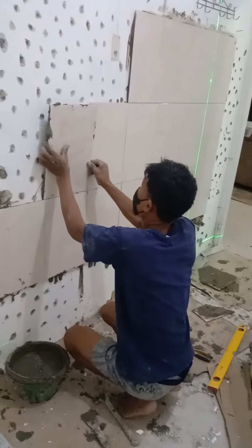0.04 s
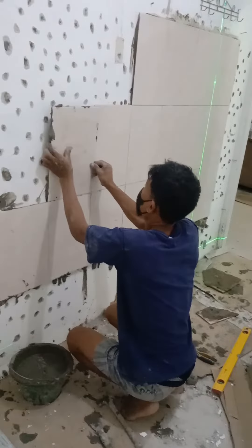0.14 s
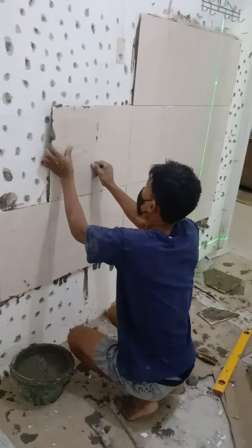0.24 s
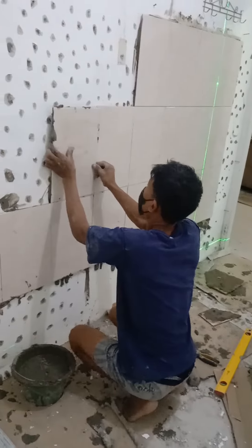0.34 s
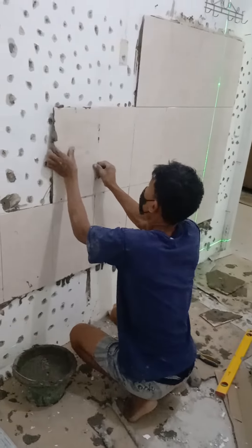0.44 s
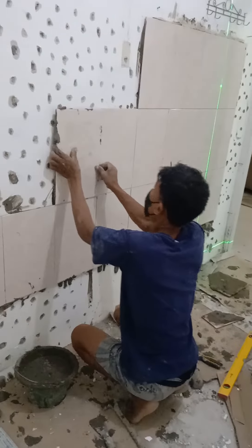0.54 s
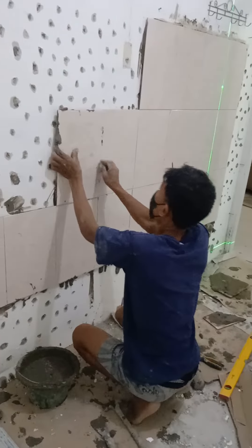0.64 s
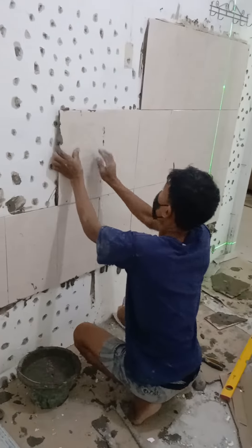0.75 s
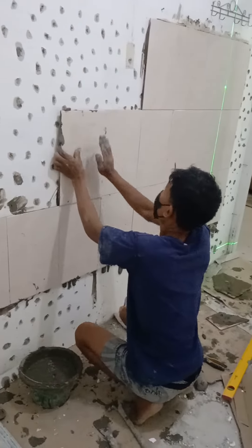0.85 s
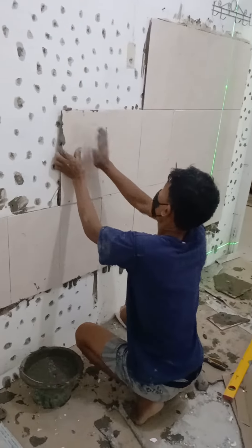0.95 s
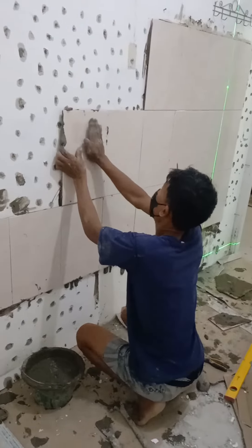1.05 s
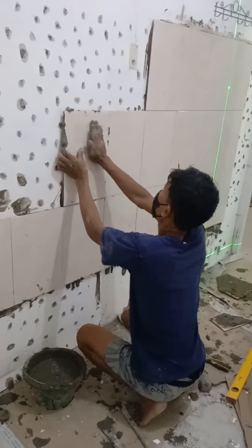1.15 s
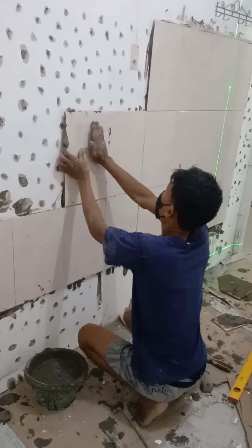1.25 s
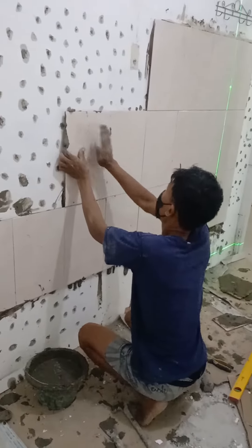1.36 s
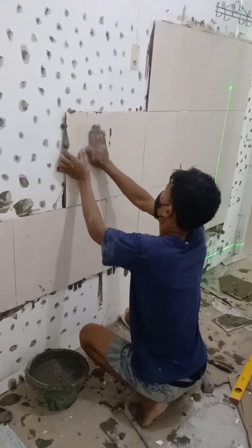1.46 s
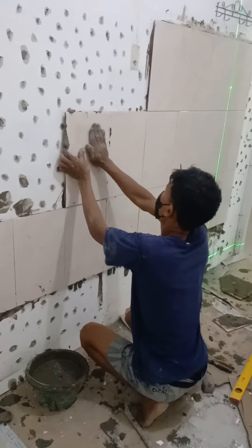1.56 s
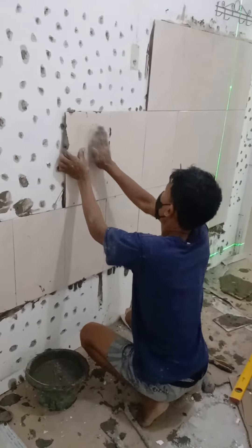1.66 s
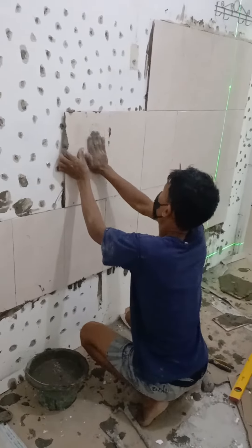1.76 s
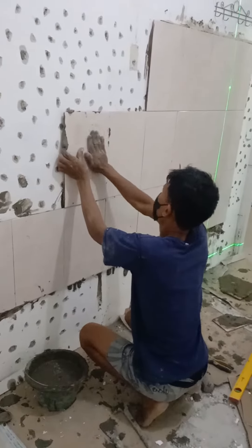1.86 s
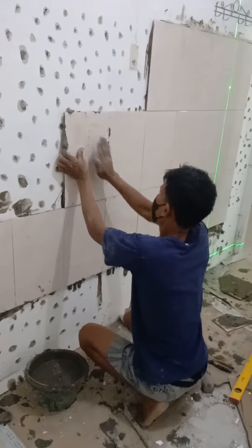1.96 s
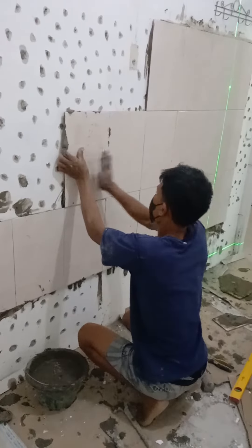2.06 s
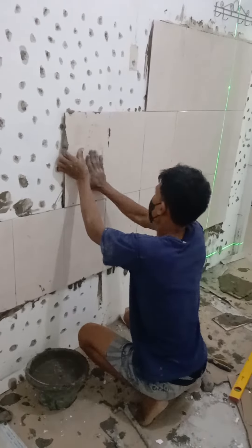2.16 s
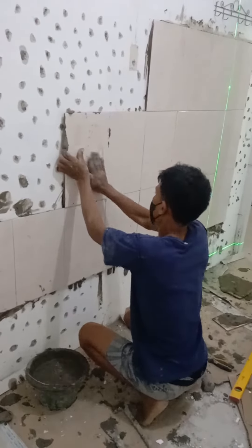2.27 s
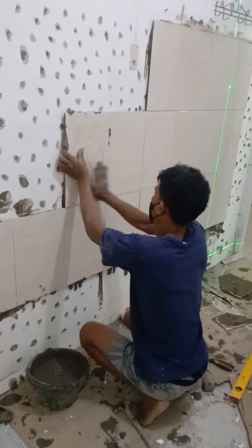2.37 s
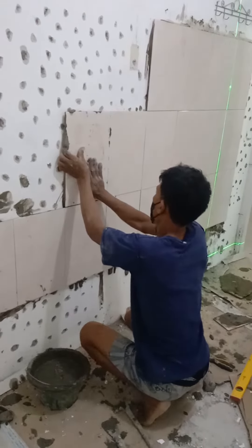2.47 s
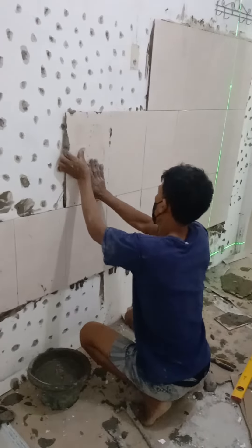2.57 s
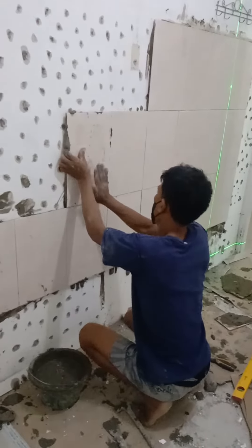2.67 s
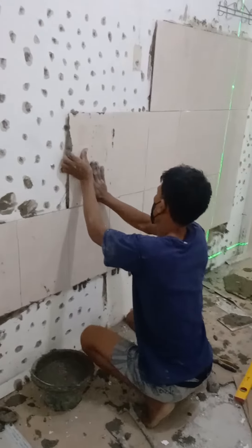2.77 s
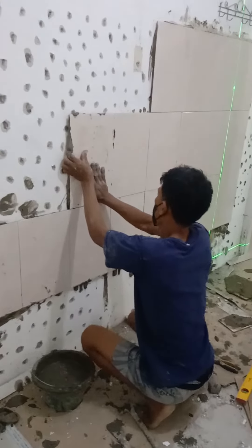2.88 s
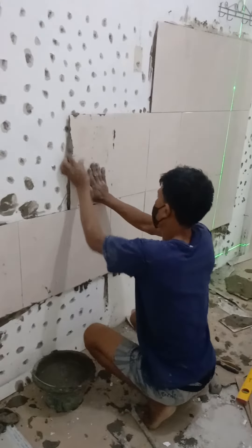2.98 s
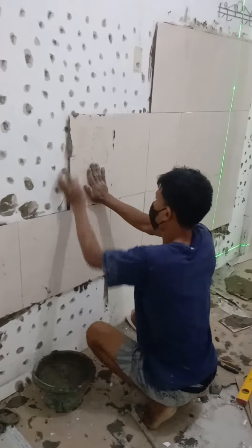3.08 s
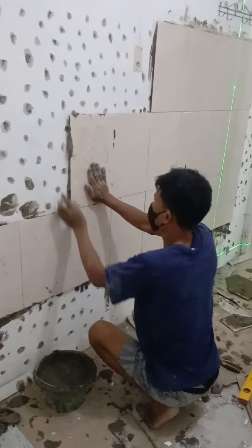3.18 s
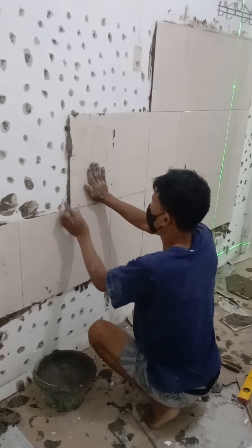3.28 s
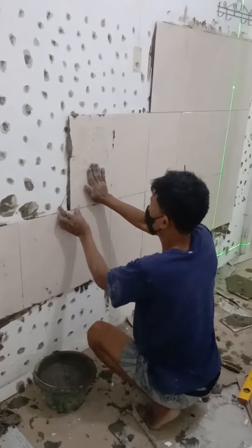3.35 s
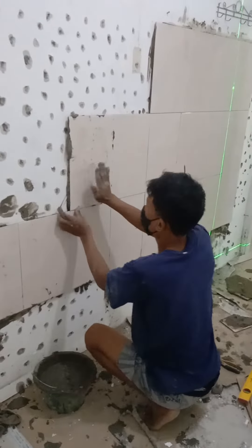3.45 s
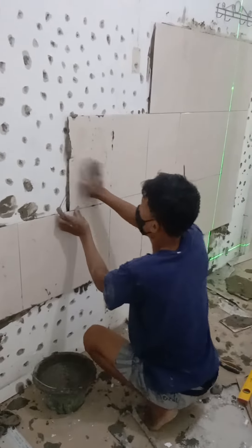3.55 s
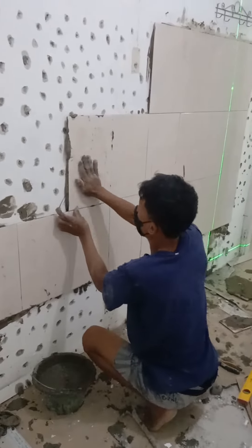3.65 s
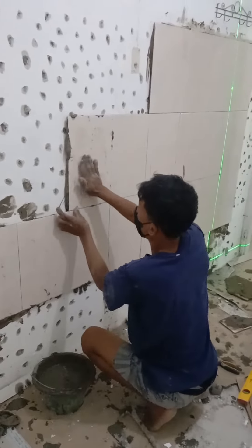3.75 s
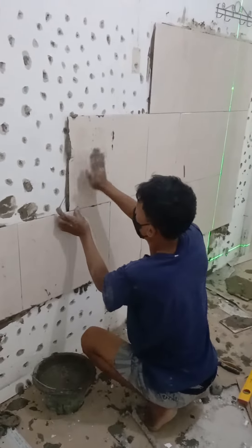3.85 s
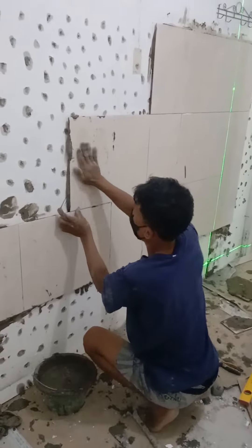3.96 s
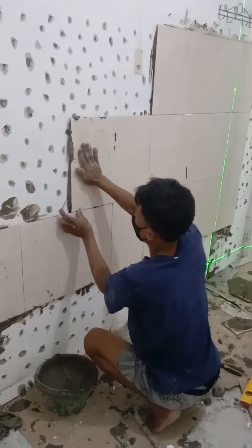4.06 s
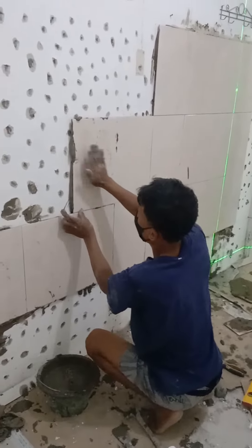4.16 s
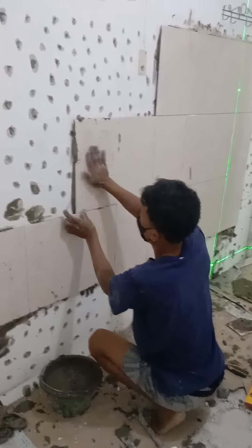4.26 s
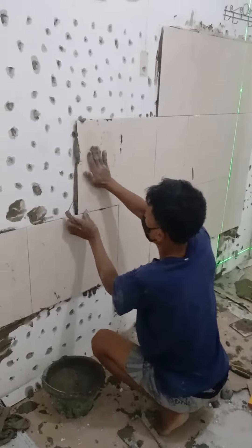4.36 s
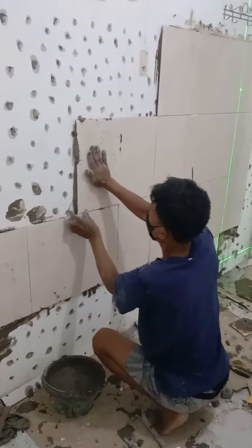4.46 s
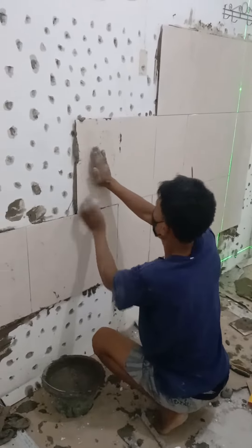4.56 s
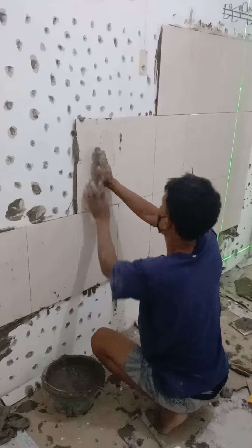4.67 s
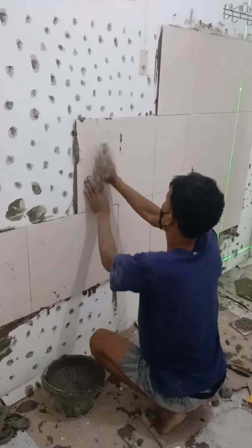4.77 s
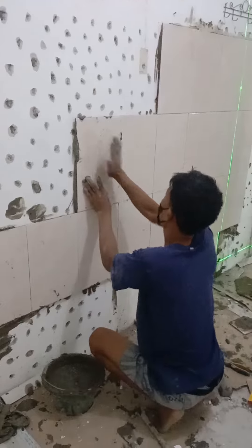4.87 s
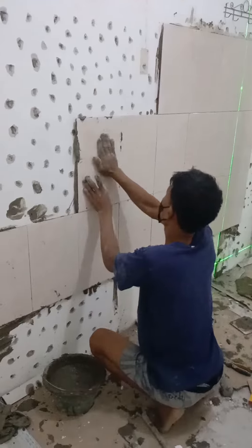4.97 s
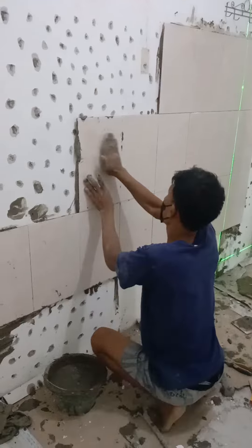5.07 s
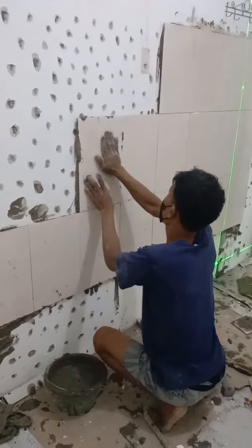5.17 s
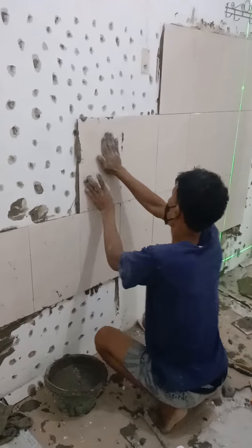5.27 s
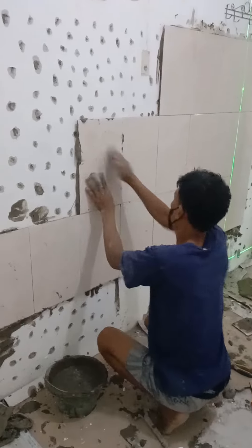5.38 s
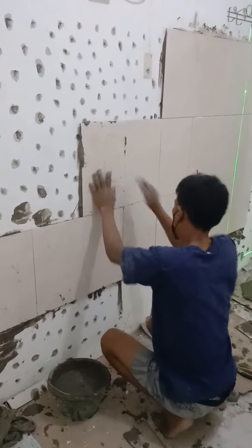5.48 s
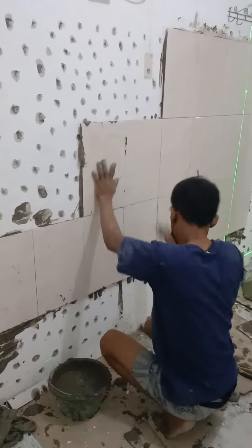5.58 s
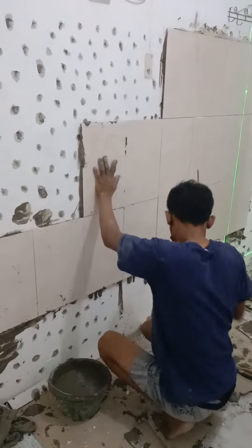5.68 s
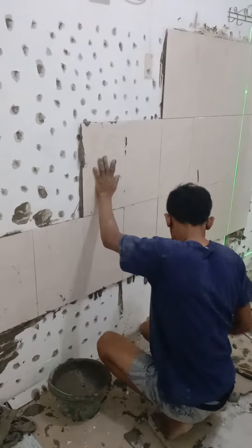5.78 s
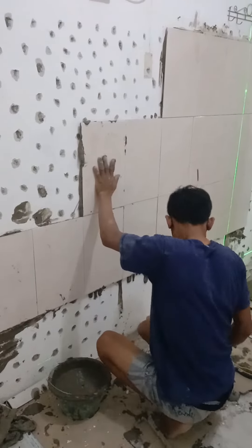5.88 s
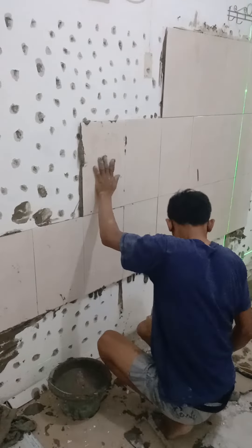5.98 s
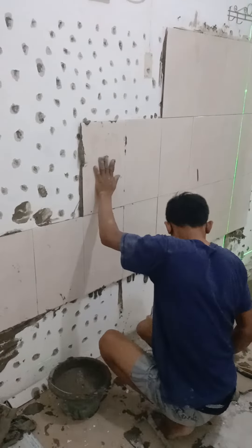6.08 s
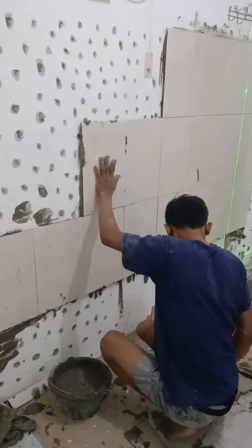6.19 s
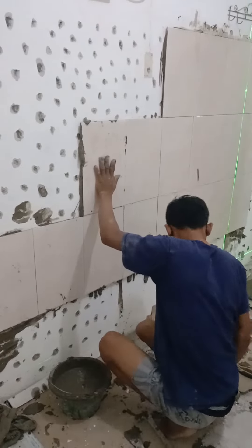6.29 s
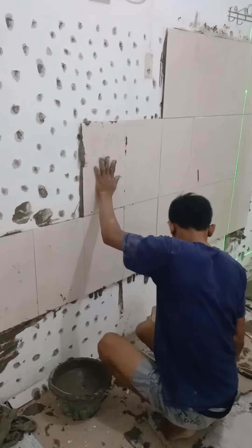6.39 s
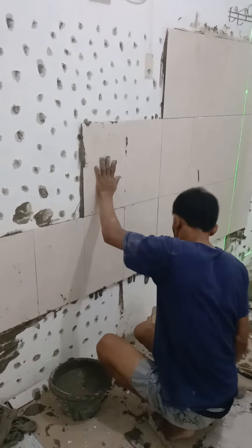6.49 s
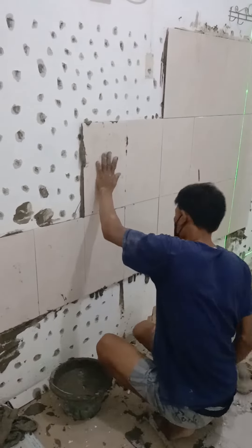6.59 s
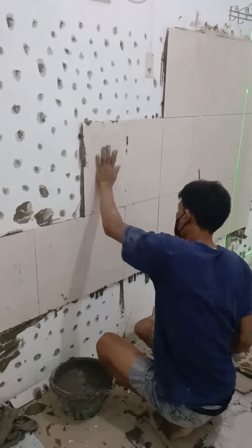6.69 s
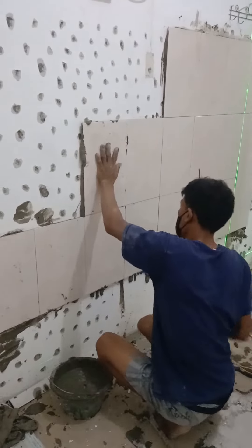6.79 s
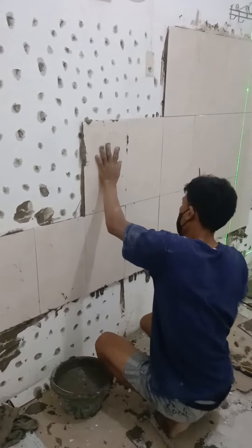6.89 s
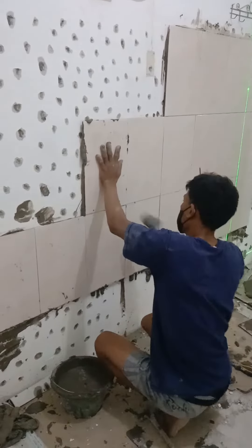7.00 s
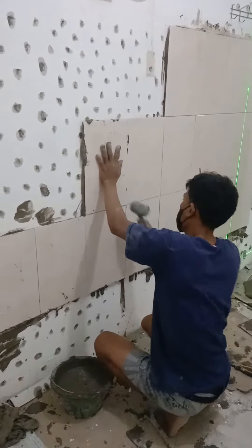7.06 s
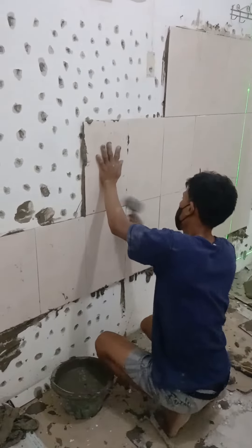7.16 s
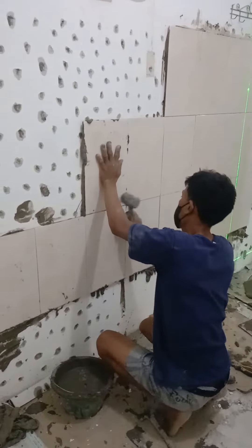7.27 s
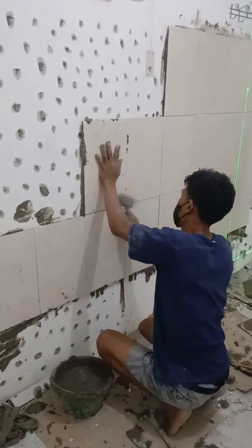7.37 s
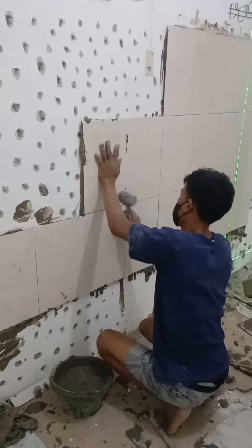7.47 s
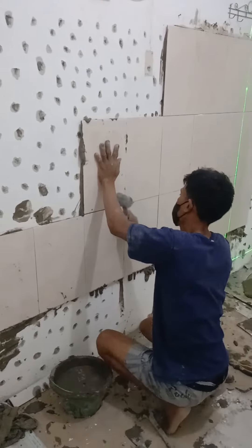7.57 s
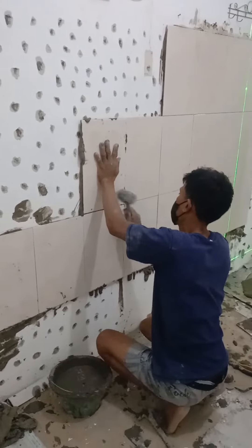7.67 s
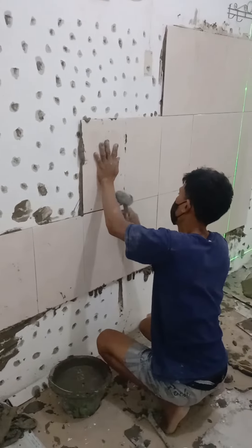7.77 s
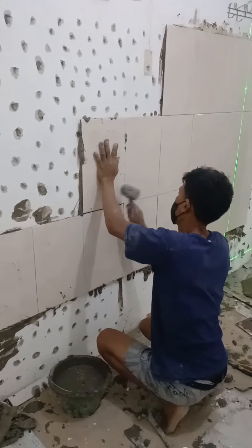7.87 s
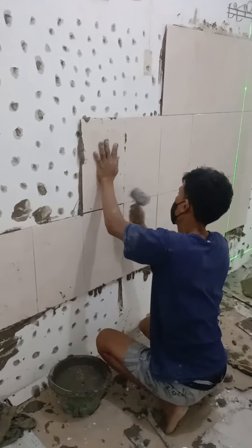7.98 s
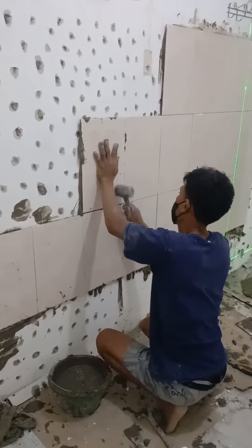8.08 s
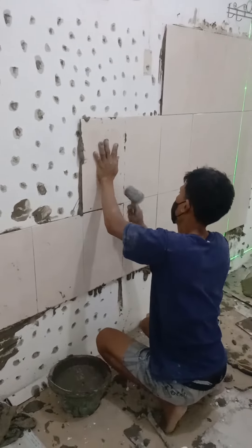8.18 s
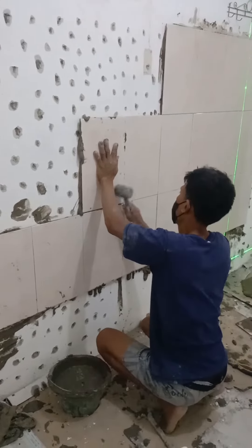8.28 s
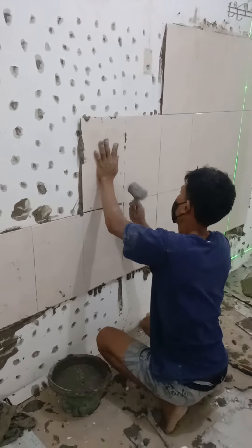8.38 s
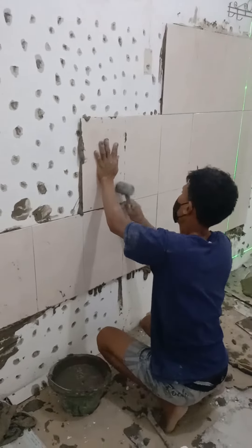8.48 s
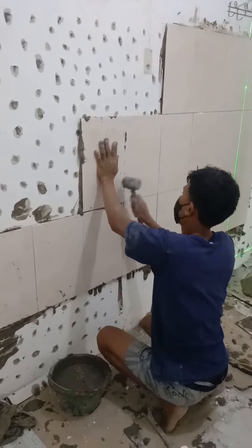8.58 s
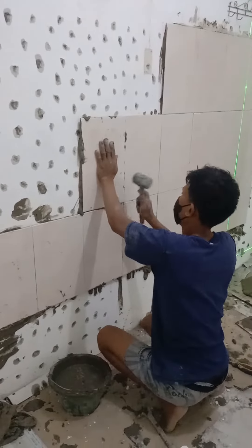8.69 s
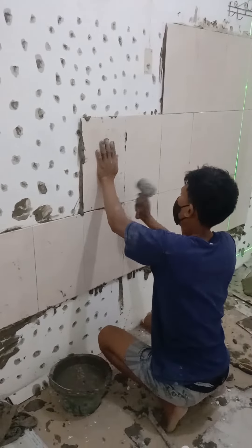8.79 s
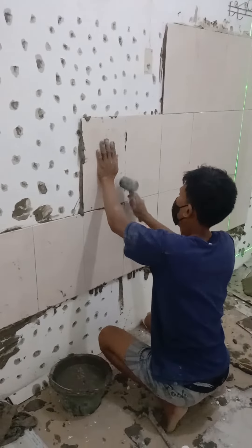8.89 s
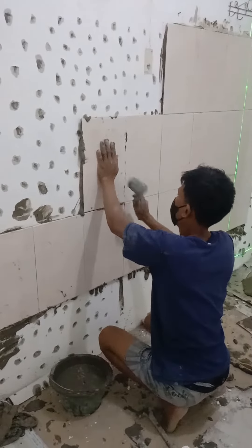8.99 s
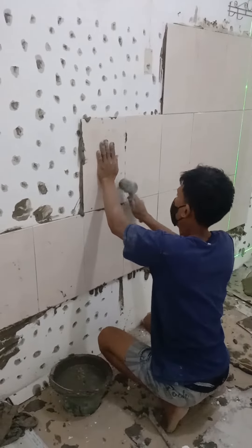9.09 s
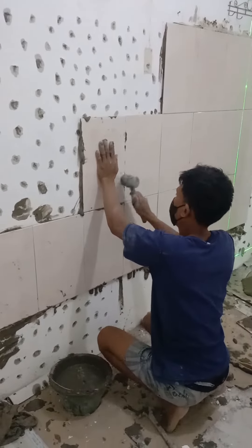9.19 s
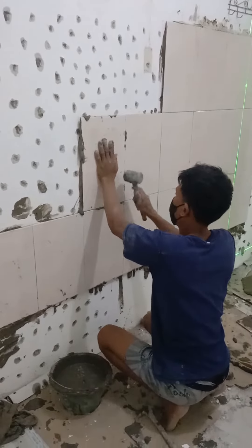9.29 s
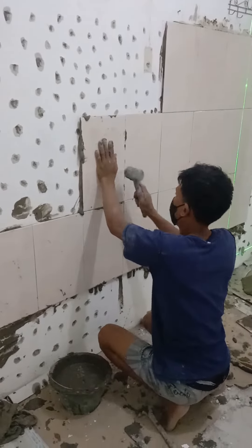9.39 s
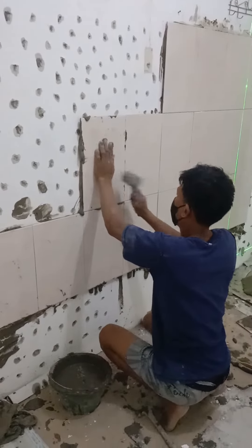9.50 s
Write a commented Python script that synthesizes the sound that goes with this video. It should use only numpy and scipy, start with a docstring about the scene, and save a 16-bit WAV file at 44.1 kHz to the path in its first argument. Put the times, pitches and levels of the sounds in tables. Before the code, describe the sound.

In a small bare bathroom, a hand rubs a sandy wall tile in short gritty strokes, then slaps it eleven times, each smack slightly different, with a damped tile ring. A mallet scrapes off the gritty floor, then knocks nine times in a quick run, growing more hollow. A brief last rub follows. The microphone is in the room; blows boom and ring, loud ones squashed, tails shortened.

```python
"""A tiler beds a ceramic wall tile in wet mortar in a small, bare bathroom.
His hand strokes the sandy joint, then slaps the tile eleven times: noise bursts through resonances of hand and tile.
A mallet is dragged off the gritty floor (a shower of clicks), then taps a quick run of nine filtered pulses.
One last stroke follows. Small ticks and faint noise lie between; the hard room booms and rings after
each blow, a noise suppressor shortens the tails and a limiter ducks the loudest blows."""
import sys
import numpy as np
from scipy import signal
from scipy.fft import rfft, irfft
from scipy.io import wavfile
from scipy.ndimage import uniform_filter1d, minimum_filter1d

SR = 44100
rng = np.random.default_rng(int(sys.argv[2]) if len(sys.argv) > 2 else 0)


def to_wav(sig):
    """Store sig (one row per channel, or 1-D mono) as 16-bit WAV at the path in sys.argv[1].

    Samples outside -1..1 are clipped; the rate is SR.
    """
    pcm = np.clip(np.atleast_2d(sig), -1, 1) * 32767
    pcm = np.round(pcm).astype(np.int16)
    wavfile.write(sys.argv[1], SR, pcm.T)  # frames by channels


N = 420713
HZ = np.fft.rfftfreq(8192, 1 / SR) + 1  # grid of all spectra; +1 keeps the logarithm finite
TILE_HZ, TILE_OCTAVES = 1267.4, 0.056  # the tile's own damped note, half width
LEAD_S = 0.004  # fingertips ahead of the palm
TAIL = SR * 3 // 4  # room response [samples]


def palm(standing):
    """Two resonances of hand and tile ring briefly under each slap; a flatter hand cracks sharper."""
    # palm slaps: (time [s], force [dB], low thud [dB], skin crack [dB], tile ring [dB], main resonance [dB],
    # main resonance of hand and tile [Hz], second resonance [Hz])
    slaps = [(1.0555, 19, 1, -5.5, 10.4, 13.4, 162, 560), (1.5063, 25, 1, -8, 13, 11.5, 1770, 1820),
             (1.813, 25.55, 3, -3, 15.7, 6.5, 2580, 300), (2.161, 26, 7.5, 0.5, 15, 10.2, 2730, 1230),
             (2.4563, 23.76, 5.5, -4.5, 11, 8.1, 1970, 3060), (2.7968, 24.4, 0, -7.5, 9.7, 6.6, 506, 2200),
             (3.6267, 25.5, 3.5, -1, 9.9, 9.6, 3510, 2550), (4.007, 24.4, 2, 4.5, 5, 7, 2400, 2020),
             (4.319, 22.5, 4.5, 5, 1.7, 8, 1950, 2500), (4.961, 23.5, 0, 3, 4, 12, 990, 3470),
             (5.205, 27.14, 4, 1, 8, 9.4, 354, 2950)]
    # palm colour: (frequency [Hz], level [dB])
    palm_colour = [(40, 1.5), (130, -4), (300, -6.5), (560, -2), (780, -7), (1100, -4), (1600, -4.5),
                   (2200, 0.5), (3100, 0.5), (4500, -4), (6500, -3.5), (16000, -15)]
    resonance_octaves, second_db = 0.18, 5  # half width of both; level of the second
    flat_slap_db, flat_direct_db = 31, -1  # force plus crack of a flat slap, its direct sound
    direct_per_db = 0.66  # direct sound per dB of force plus crack

    out = np.zeros(N)
    for s, force_db, thud_db, crack_db, ring_db, main_db, main_hz, second_hz in slaps:
        colour_db = read(palm_colour, HZ) + tile_ring(ring_db)
        colour_db += thud_db * (1 - above(750)) + crack_db * above(2500)
        resonances_db = peak(main_hz, main_db, resonance_octaves)
        resonances_db += peak(second_hz, second_db, resonance_octaves)
        direct_db = flat_direct_db + direct_per_db * (force_db + crack_db - flat_slap_db)
        slap = signal.fftconvolve(landing(), pulse(force_db + colour_db + resonances_db))
        add(out, s - LEAD_S, in_room(slap, echoes() + standing, direct_db))
    return out


def landing(roll_s=0.00064, fingertips_db=-26):
    """Fingertips touch first, then the palm rolls flat: a brief burst with a level spectrum."""
    t = np.arange(SR // 100) / SR - LEAD_S
    burst = np.exp(-0.5 * (t / roll_s) ** 2) * rng.standard_normal(len(t))
    z = rfft(burst)
    flat = irfft(z / abs(z), len(t))
    fingertips = rng.standard_normal(len(t)) * (t < 0)
    return flat + amp(fingertips_db) * fingertips / np.linalg.norm(fingertips)


def mallet(standing, wander_rad=0.78, ring_db=4, clack_hz=1200):
    """Rubber on mortar-damped tile: a thump and a click, from nearly the same spot each time."""
    # mallet blows: (time [s], force [dB], frequency above which the click fades [Hz])
    blows = [(7.2582, 26, 7700), (7.4339, 30, 8200), (7.622, 30.5, 6500), (7.8155, 32, 6560),
             (8.0825, 34, 7400), (8.2910, 32.5, 7300), (8.4988, 32.5, 8640), (8.9056, 32, 9500),
             (9.1256, 32.5, 4200)]
    # mallet colour: (frequency [Hz], level [dB])
    mallet_colour = [(40, -5.5), (120, -1), (300, 1.5), (400, -12), (490, -5.5), (680, -4.5), (830, -11.5),
                     (1100, -13), (1650, -17.5), (2600, -9), (3300, -13), (4300, -15.5), (5600, -12.5),
                     (16000, -4.5)]
    # clack as the mallet works towards a hollower part of the tile: (time [s], level [dB])
    hollow = [(7.3, -2.5), (7.75, -6), (8.1, 2), (8.9, 7)]
    # rubber stiffens under a firmer blow, so the click outgrows the thump
    firm_blow_db, firm_click_db, click_per_db = 32, -3.5, 0.63

    out = np.zeros(N)
    spot = echoes()
    for s, force_db, fade_hz in blows:
        clack_db = np.interp(s, *np.transpose(hollow))
        click_db = firm_click_db + click_per_db * (force_db - firm_blow_db)
        body_db = read(mallet_colour, HZ) + tile_ring(ring_db) + peak(clack_hz, clack_db, octaves=0.3)
        click_colour_db = click_db * above(1140) - 22 * above(fade_hz)
        room = np.cos(wander_rad) * spot + np.sin(wander_rad) * echoes() + standing
        blow = -pulse(force_db + body_db + click_colour_db)  # the tile is pushed away first
        add(out, s, in_room(blow, room, direct_db=-9.0))
    return out


def strokes():
    """The hand rubs the sandy tile: each shower of grains swells, fades and stirs the tile's note."""
    # strokes: (start [s], swell [s], length [s], peak level [dB], brightness [dB per octave])
    hand_strokes = [(.029, .008, 0.088, -38, -1.5), (.104, .02, 0.15, -32, -0.5),
                    (0.191, .055, .21, -40.5, 0), (0.334, 0.094, 0.18, -37.5, -0.5),
                    (0.637, 0.026, 0.091, -41, -0.5), (1.373, .034, .09, -44.5, 2.5),
                    (3.201, .007, .045, -54, 2.5), (3.366, .025, .07, -56, 1.5),
                    (3.513, .01, 0.042, -56.5, 0.5), (5.768, .08, .14, -41.5, 5.5),
                    (9.341, .016, .09, -39.5, 2)]
    # stroke colour: (frequency [Hz], level [dB])
    stroke_colour = [(60, -22.5), (150, -8.5), (300, -11), (600, -3.5), (900, 0.5), (1600, -2.5),
                     (3000, -0.5), (6000, -6), (10000, -10.5), (16000, -19.5)]
    full_ring_db, ring_per_tilt = 14.5, 2.3  # a light, bright stroke stirs the tile less

    out, t = np.zeros(N), np.arange(SR) / SR
    for s, swell_s, length_s, db, tilt in hand_strokes:
        pressure = np.interp(t, [0, swell_s, length_s], [0, 1, 0])
        colour_db = read(stroke_colour, HZ) + tilt * np.log2(HZ / TILE_HZ)
        colour_db += tile_ring(full_ring_db - ring_per_tilt * tilt)
        add(out, s, amp(db) * pressure * grit(colour_db))
    return out


def floor_drag():
    """The mallet is dragged off the gritty floor: one scrape of grains under a level curve."""
    # drag: (time [s], level [dB])
    drag = [(6.371, -62.5), (6.431, -57.5), (6.52, -34.5), (6.56, -43), (6.61, -43.5), (6.72, -65),
            (6.971, -63.5), (7.15, -78)]
    # drag colour: (frequency [Hz], level [dB])
    drag_colour = [(60, -15), (140, -4.5), (350, 1), (800, -8.5), (2200, 3), (4500, -4.5), (16000, -5.5)]

    out, t = np.zeros(N), np.arange(SR) / SR
    times_s, drag_db = np.transpose(drag)
    level_db = np.interp(times_s[0] + t, times_s, drag_db, right=-np.inf)
    add(out, times_s[0], amp(level_db) * grit(read(drag_colour, HZ)))
    return out


def grit(colour_db, grains_per_s=2800, grain_spread_db=6.0, catch_db=3):
    """One second of dragging over sand: a shower of tiny clicks that catches and slips."""
    grains = rng.standard_normal(SR) * amp(grain_spread_db * np.minimum(rng.exponential(1, SR), 3))
    grains *= rng.random(SR) < grains_per_s / SR
    catching = evened(uniform_filter1d(rng.standard_normal(SR), size=400))
    grains *= amp(catch_db * catching)
    return evened(signal.fftconvolve(grains, pulse(colour_db))[:SR])


def ticks():
    """Touches, a grit snap, a stroke's catch and sand cracks in the joint: single band-shaped pulses."""
    # light touches, a grit snap and the catch of a stroke: (time [s], level [dB], centre [Hz])
    touches = [(0.138, 2.5, 4630), (0.642, -6, 1240), (.980, -13, 2170), (1.048, 7.5, 2190),
               (1.48, 7, 1400), (1.502, 17.5, 2045), (8.7533, 2.5, 2690)]
    # sand grains cracking in the joint: (time [s], level [dB])
    cracks = [(1.249, -4), (2.937, -2), (4.628, -11), (7.522, -14), (7.713, 4), (7.788, -7)]

    out = np.zeros(N)
    for s, db, hz in touches:
        add(out, s, pulse(db + hump(hz, octaves=0.58)))
    for s, db in cracks:
        add(out, s, pulse(db + hump(10800, octaves=0.3)))
    return out


def tile_ring(db):
    """The tile's note, in dB over HZ."""
    return peak(TILE_HZ, db, TILE_OCTAVES)


def in_room(x, room, direct_db):
    """The direct sound, the nearest walls and the room's answer."""
    # first reflections: (delay [s], level [dB])
    near_walls = [(.0062, -19), (0.0106, -14.5), (0.0139, -22.5)]
    shadow_hz, shadow_db = 7600, -2.5  # hand and body shade the top of the direct sound

    out = signal.oaconvolve(x, room)
    # a small panel sends little bass straight out
    direct = signal.lfilter(*signal.butter(1, 600, "high", fs=SR), x)
    direct = signal.oaconvolve(direct, pulse(shadow_db * above(shadow_hz)))
    for s, db in [(0.0009, direct_db)] + near_walls:
        add(out, s, amp(db) * direct)
    return out


def echoes(dense_after_s=0.07):
    """Reflections from one spot in the room thicken with time, each band dying at its own speed."""
    # diffuse echo colour: (frequency [Hz], level [dB])
    wash = [(30, -18.5), (80, -23), (130, -6), (200, -13), (320, -4), (420, -3), (620, -3), (850, -0.5),
            (16000, 0)]
    # decay time: (frequency [Hz], t60 [s])
    room_t60 = [(60, 0.71), (200, 0.84), (500, 0.68), (1200, 0.59), (2800, 0.51), (5500, 0.51),
                (9000, 0.37), (15000, 0.34)]

    density = 0.25 * np.clip((np.arange(TAIL) / SR / dense_after_s) ** 2, 0.3, 1)
    chance = rng.uniform(-1, 1, TAIL)
    taps = np.sign(chance) * (abs(chance) < density) / np.sqrt(density)
    taps[:SR // 250] = 0  # none in the first 4 ms
    hz, t, z = signal.stft(taps, SR, nperseg=256)
    decay = np.exp(-np.log(1000) * t / read(room_t60, hz)[:, None])
    tail = signal.istft(z * decay, SR, nperseg=256)[1][:TAIL]
    tail = 0.69 * tail / np.sqrt(np.sum(tail ** 2))
    return signal.fftconvolve(tail, pulse(read(wash, HZ)))[:TAIL]


def boom():
    """Standing waves between the bare walls swell, beat and die."""
    # standing waves: (frequency [Hz], level [dB], t60 [s], build-up [s])
    room_modes = [(65.46, 8.5, 0.68, 0.079), (118.05, 12, 0.51, 0.071), (132.2, 12, .8, 0.19),
                  (141.1, 11, 1, .09), (147.2, 5, 1, 0.035), (172.2, 0.5, 0.26, 0.006),
                  (186.6, 0.5, 1, 0.0054), (191, 6, 0.78, 0.038), (208.1, -0.5, 1, 0.013),
                  (230.4, 5.5, 0.91, 0.0054), (264, 7.5, 0.8, 0.15), (300.3, -10, .6, 0.0035),
                  (297.5, 10.5, 0.67, 0.075), (308.8, 6, 0.97, .01), (484.4, 8, 0.63, 0.011),
                  (539, 0.5, 0.43, 0.009), (555.4, 0.5, 0.48, 0.012), (590.5, -1, 0.35, 0.0079),
                  (600, 1.5, 0.78, 0.01), (634, 9, 0.37, 0.0037), (659, 5, 0.12, 0.012),
                  (700, -1, 1, 0.012)]

    t = np.arange(TAIL) / SR
    out = np.zeros(TAIL)
    for hz, db, t60_s, build_s in room_modes:
        rate = np.log(1000) / t60_s
        envelope = np.exp(-rate * t) * (1 - np.exp(-(t / build_s) ** 2))
        out += amp(db) * 2 * rate / SR * envelope * np.sin(2 * np.pi * hz * t)
    return out


def still_air(rms_db=-66):
    """Faint steady hiss with a low murmur of the room: filtered noise."""
    # background colour: (frequency [Hz], relative level [dB])
    air_colour = [(30, -26), (80, -13.5), (135, -3.5), (260, -8.5), (305, 11), (370, -9.5), (900, -17),
                  (1270, -2.5), (1600, -17.5), (2500, -7.5), (5500, -12), (9000, -8.5), (16000, -15.5)]
    noise = signal.oaconvolve(rng.standard_normal(N), pulse(read(air_colour, HZ)))[:N]
    return amp(rms_db) * evened(noise)


def amp(db):
    """Decibels to gain."""
    return np.exp(np.asarray(db) * (np.log(10) / 20))


def evened(x):
    """Scales to rms 1."""
    return x / np.sqrt(np.mean(x ** 2) + 1e-20)


def read(points, hz):
    """Reads a spectrum on a log-frequency axis."""
    f, value = np.transpose(points)
    return np.interp(np.log(hz + 1), np.log(f), value)


def add(mix, s, sound):
    """Mixes a sound in at s seconds."""
    part = mix[max(round(s * SR), 0):][:len(sound)]
    part += sound[:len(part)]


def peak(hz, db, octaves):
    """A resonance, in dB over HZ."""
    return db / (1 + (np.log2(HZ / hz) / octaves) ** 2)


def hump(hz, octaves):
    """A broad band with straight skirts, in dB over HZ."""
    return -12 * (np.hypot(1, np.log2(HZ / hz) / octaves) - 1)


def above(hz):
    """A soft step from 0 to 1 at hz."""
    return 1 / (1 + np.square(np.square(hz / HZ)))


def pulse(db):
    """The shortest causal (minimum-phase) pulse with this spectrum."""
    log_gain = np.log(amp(np.maximum(db, -80)))
    circle = np.concatenate([log_gain, log_gain[-2:0:-1]])
    spectrum = np.exp(np.conj(signal.hilbert(circle)))
    return np.fft.ifft(spectrum).real[:len(HZ) // 2]


def hush(x, depth_db=7, knee_db=3):
    """A noise suppressor turns down each band that falls under its threshold, cutting the tails short."""
    # suppressor threshold: (frequency [Hz], level [dB])
    hush_below = [(100, -69), (1000, -75.5), (4000, -82.5), (16000, -94.5)]

    hz, _, z = signal.stft(x, SR, nperseg=512, noverlap=384)
    power = uniform_filter1d(abs(z) ** 2, size=5, axis=0)  # over frequency
    power = uniform_filter1d(power, size=7, axis=1)  # over time
    over_db = 10 * np.log10(abs(power) + 1e-20) - read(hush_below, hz)[:, None]
    z = z * amp(-depth_db * (1 - np.tanh(over_db / knee_db)) / 2)
    return signal.istft(z, SR, nperseg=512, noverlap=384)[1][:N]


def scene():
    """Hand, mallet and grit in one room."""
    standing = boom()
    touched = ticks() + strokes() + floor_drag()
    handling = in_room(touched, echoes() + standing, direct_db=-6)[:N]
    return (palm(standing) + mallet(standing) + handling + still_air())[None]


def record(dry, recovery_db_per_s=95, ceiling_db=-1.2, edge_hz=16200):
    """Noise suppressor, microphone colour, a look-ahead peak limiter, then the band limit."""
    # microphone colour: (frequency [Hz], level [dB])
    mic_colour = [(20, -11), (50, 6), (4200, 2), (4750, -2.5), (5400, 2.5), (6200, -4), (6900, -2.5),
                  (7400, -6.5), (8000, -19.5), (9000, -12.5), (13500, -19.5), (14600, -12), (15500, -14.5),
                  (16200, -27)]

    x = signal.oaconvolve(hush(dry[0]), pulse(read(mic_colour, HZ)))[:N]
    fall_db = np.arange(N) / SR * recovery_db_per_s
    level_db = 20 * np.log10(abs(x) + 1e-9)
    held_db = np.maximum.accumulate(level_db + fall_db) - fall_db
    duck_db = np.minimum(ceiling_db - held_db, 0)
    duck_db = minimum_filter1d(duck_db, size=200)  # look-ahead
    x = x * amp(uniform_filter1d(duck_db, size=200))
    low_pass = signal.firwin(511, edge_hz, window=("kaiser", 9), fs=SR)
    return signal.oaconvolve(x, low_pass, "same")[None]


dry = scene()
out = record(dry)
to_wav(out)
```